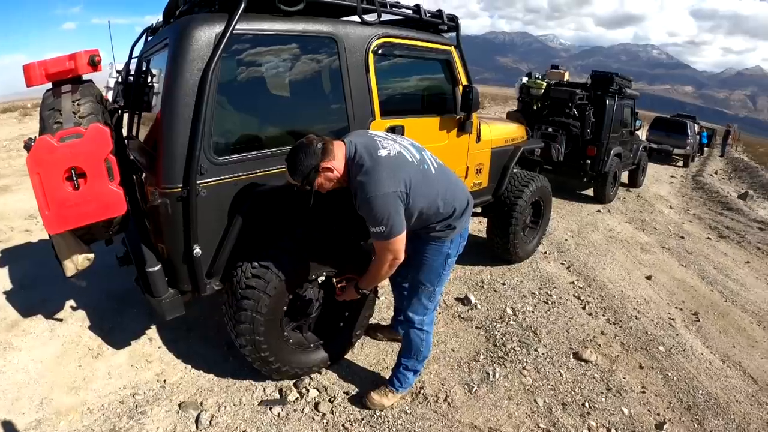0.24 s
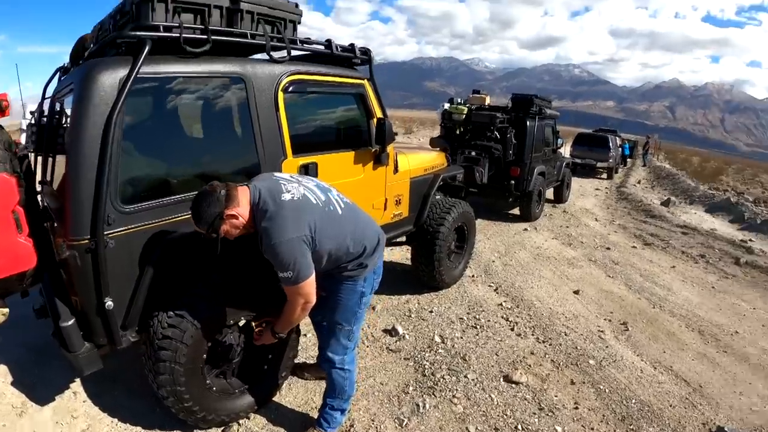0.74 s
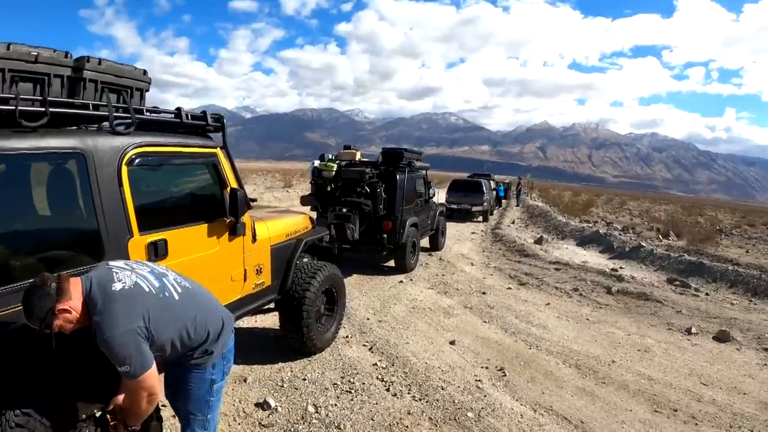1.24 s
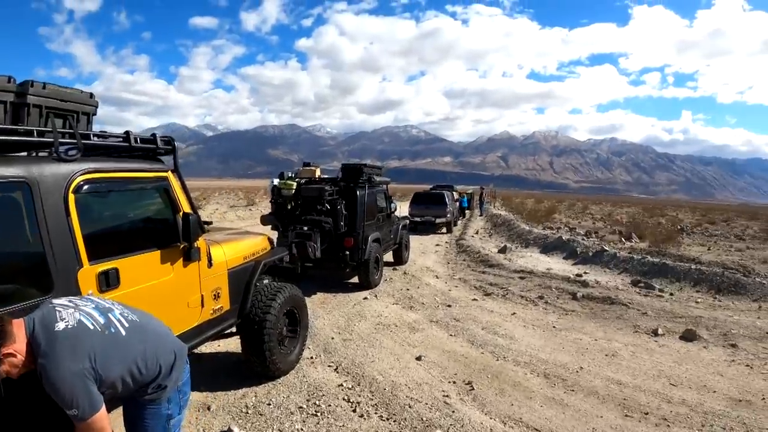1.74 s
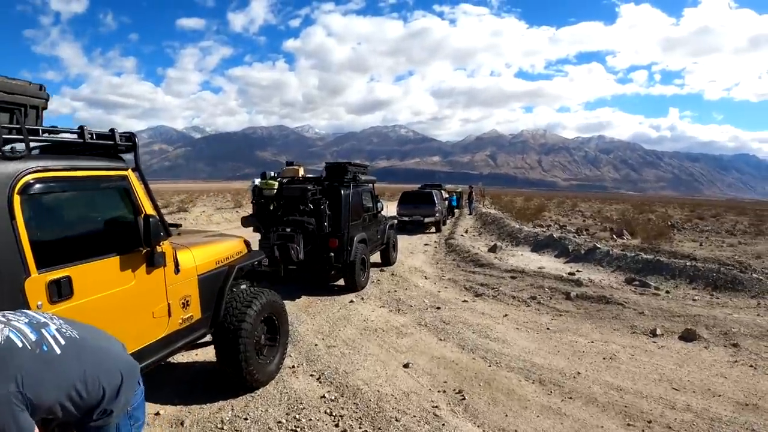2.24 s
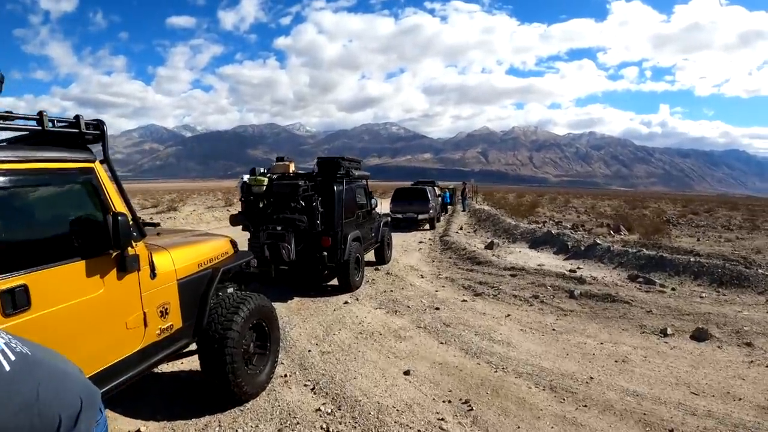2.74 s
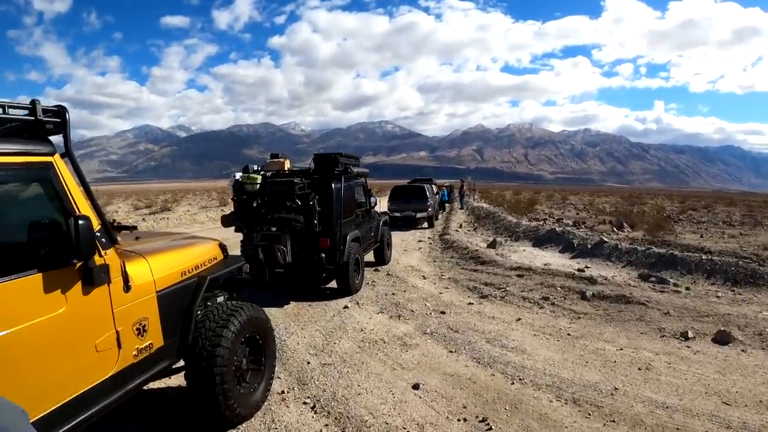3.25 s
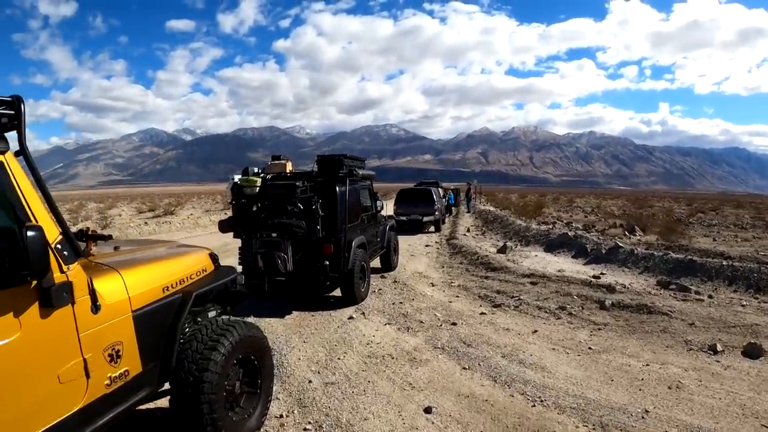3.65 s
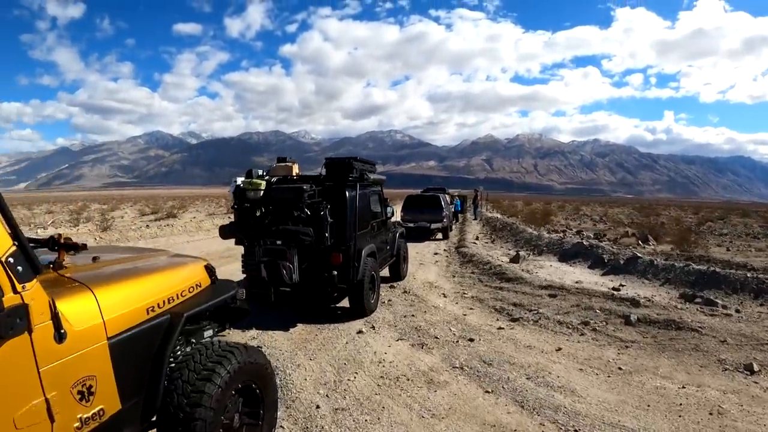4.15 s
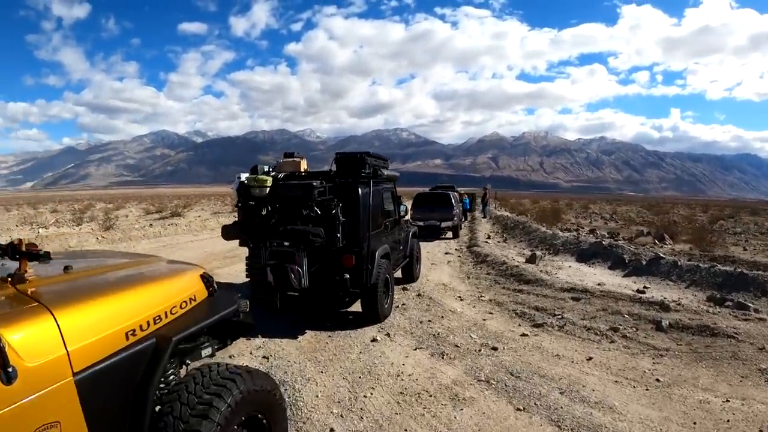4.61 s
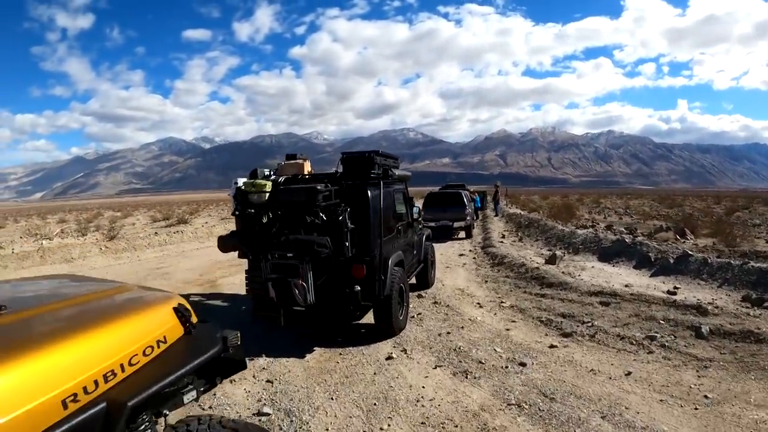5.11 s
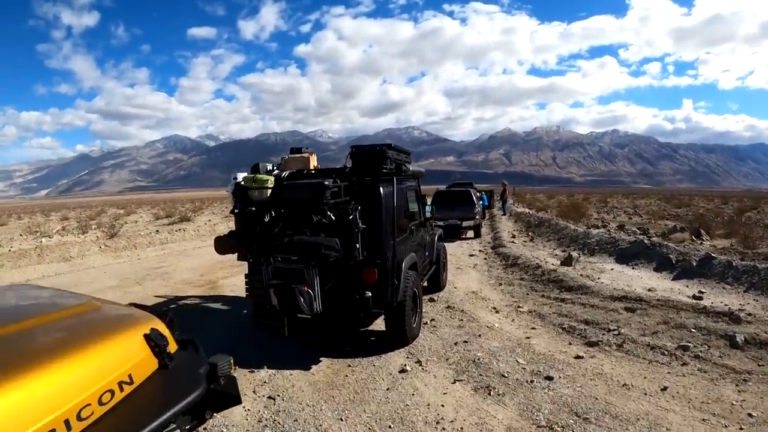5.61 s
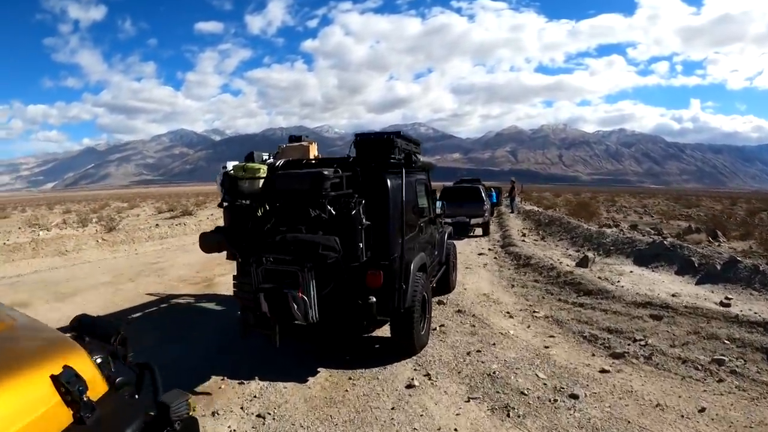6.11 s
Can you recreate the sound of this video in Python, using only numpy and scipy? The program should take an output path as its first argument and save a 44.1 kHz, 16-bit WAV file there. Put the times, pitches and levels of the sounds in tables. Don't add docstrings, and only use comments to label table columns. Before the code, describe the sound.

Air hisses steadily from a tyre valve outdoors while wind thumps and flutters on the microphone and boots crunch on grit.

```python
import sys
import numpy as np
from scipy import signal
from scipy.fft import rfft, irfft
from scipy.io import wavfile
from scipy.ndimage import uniform_filter1d, map_coordinates

SR = 44100
rng = np.random.default_rng(int(sys.argv[2]) if len(sys.argv) > 2 else 0)


def transcribe(u):
    v = np.clip(np.atleast_2d(u).T, -1, 1)
    q = np.round(v * 32767).astype(np.int16)
    wavfile.write(sys.argv[1], SR, q)


def elevation(decibels):
    levels = np.asarray(decibels, float)
    return 10 ** (levels / 20)


N = 280917
T = np.arange(N) / SR
HZ = np.fft.rfftfreq(N, 1 / SR) + 1e-9


def unit(x):
    return x / np.sqrt(np.mean(x ** 2))


def curves(table):
    times_s, *columns = np.transpose(table)
    return [np.interp(T, times_s, column) for column in columns]


def shaped(gain):
    return irfft(rfft(rng.standard_normal(N)) * gain, N)


def walk(rate):
    hold = int(SR / rate)
    steps = np.repeat(rng.standard_normal(N // hold + 1), hold)
    return unit(uniform_filter1d(uniform_filter1d(steps, hold), hold)[:N])


def bursts(events, width, rise):
    out, size = np.zeros(N), 4096
    t = np.arange(size) / SR
    noises = rng.standard_normal((len(events), size))
    for (start_s, peak_db, hz, length_ms), noise in zip(events, noises):
        b, a = signal.iirpeak(hz, 1 / width, fs=SR)
        ring = signal.lfilter(b, a, signal.lfilter(b, a, noise))
        age = t * 1000 / length_ms
        ring = ring * np.clip(age / rise, 0, 1) * np.exp(-age ** 2)
        i = int((start_s - 0.314 * rise * length_ms / 1000) * SR)
        out[i:i + size] += (elevation(peak_db) * ring / np.abs(ring).max())[:N - i]
    return out


def spells(rows, edge_ms):
    def edge(since_s):
        return np.clip(since_s * 1000 / edge_ms + .5, 0, 1) ** 2

    return sum(elevation(db) ** 2 * (edge(T - s) * edge(s + length - T)) for s, length, db in rows)


def jet():
    # t/s, level/dB, muffling by hand and camera/dB, shade of the car/dB
    jet_path = [(0, -30, 2.5, 3), (.5, -31, 0, -0.5), (1.0, -30.5, -1.5, 1), (1.3, -32, -1.5, -3),
                (1.9, -33, -2.5, -1.5), (2.15, -32, -3.5, 3), (2.5, -31.5, -3, 0), (3.0, -30.5, 1.5, 1.5),
                (3.6, -30.5, 2, 1.5), (3.9, -29.5, 0, -1.5), (4.15, -30, 2, -0.5), (4.4, -30.5, 2, 3),
                (4.7, -33, 2.5, -2.5), (5.0, -35, 2.5, -4), (5.4, -35.5, 3.5, -2.5), (5.7, -39, 11, -3),
                (5.95, -44, 8.5, 3.5), (6.37, -42.5, 10, 1)]
    # f/Hz, spectral level/dB
    jet_colour = [(600, -19), (1000, -7.5), (1500, -6.5), (2200, -2), (3300, -1), (4400, -2), (6200, -2),
                  (7550, -6), (8350, -2.5), (9300, -5), (10000, -8), (12000, -16), (14000, -26.5),
                  (15000, -33)]
    zones_hz = [1400, 2900, 5600, 9500]
    muffle_shares = [1.05, 0.26, -0.15, -0.35]
    shade_shares = [0.24, 0, 0.17, 0.43]
    # lag at start/ms, at middle/ms, at end/ms, level/dB
    echoes = [
        (2.1, 1.93, 1.64, -20.5),
        (3.1, 3.5, 2.44, -15),
        (4.9, 4.2, 4.7, -21),
        (6.8, 6.1, 7.5, -16.5),
    ]

    main_db, muffle_db, shade_db = curves(jet_path)
    tilt = np.outer(muffle_shares, muffle_db) - np.outer(shade_shares, shade_db)
    f, db = np.transpose(jet_colour)
    colour = elevation(np.interp(np.log(HZ), np.log(f), db, left=-28))
    colour = colour / np.sqrt(np.sum(colour[(HZ > 1900) & (HZ < 4200)] ** 2) / len(HZ))
    air = rfft(rng.standard_normal(N)) * colour
    puff = walk(14)
    direct = 0
    for step in range(23):
        hz = 350 * 2 ** (step / 4)
        zone = np.cos(np.pi / 2 * np.clip(4 * np.log2(HZ / hz), -1, 1)) ** 2
        place = np.interp(np.log(hz), np.log(zones_hz), np.arange(4))
        k = min(int(place), 2)
        tilt_db = tilt[k] + (place - k) * (tilt[k + 1] - tilt[k])
        waver_db = 0.55 * walk(4.5) + 0.45 * puff + 0.8 * (hz / 12000) ** 2 * walk(30)
        direct = direct + irfft(air * zone, N) * elevation(tilt_db + waver_db)
    heard = direct
    for *lags_ms, echo_db in echoes:
        lag_ms = np.interp(T, [0, T[-1] / 2, T[-1]], lags_ms) + 0.068 * walk(1.53)
        lag = lag_ms * SR / 1000
        heard = heard + elevation(echo_db) * map_coordinates(direct, [np.arange(N) - lag], order=2)
    return fringes(heard) * elevation(main_db - 1.74 + ducking())


def fringes(x):
    # start t/s, end t/s, f/Hz, level/dB
    narrow = [(-.8, 1.1, 2300, 4.5), (-.4, .8, 1750, -3), (3.0, 3.9, 9820, 3), (-.4, .9, 10300, -5),
              (-.4, .9, 5120, -4), (-.4, .9, 6120, 3), (1.1, 2.7, 8450, 5), (1.3, 2.5, 9280, -5),
              (1.3, 2.2, 9980, 4), (5.9, 6.8, 4620, 3), (1.2, 2.5, 6500, 3), (1.2, 2.1, 2350, -3),
              (2.0, 2.7, 2720, 5), (2.5, 3.6, 1900, 7), (2.5, 3.2, 3410, 6), (2.8, 3.5, 3170, -4),
              (2.7, 3.6, 5000, 6), (2.0, 2.9, 3920, 3), (2.3, 3.1, 5720, 4), (4.9, 5.5, 3250, 3),
              (4.1, 5.0, 2400, 4), (4.2, 4.8, 3200, 3), (4.0, 4.8, 1320, -4), (5.5, 6.2, 3120, -5),
              (5.9, 6.8, 5750, 6), (3.1, 4.2, 2670, 2.5), (2.5, 3.2, 2600, 3), (2.0, 2.8, 9580, 4),
              (1.0, 2.4, 4750, -3), (-.6, 2.6, 890, -7)]
    # start t/s, end t/s, f/Hz, level/dB
    broad = [
        (-.8, 1.0, 9250, 7),
        (1.4, 3.9, 7500, -5),
        (3.5, 4.3, 5900, 5),
        (5.8, 6.8, 1600, -3),
        (2.7, 3.9, 4420, -3),
        (-.4, 2.0, 3450, 4),
        (.6, 1.1, 2800, 3),
        (4.8, 6.8, 7100, 3),
    ]
    sag_per_s = .025

    f, t, spec = signal.stft(x, SR, nperseg=1024)
    db = np.zeros(spec.shape)
    for rows, breadth in ((narrow, 1), (broad, 1.9)):
        for start_s, end_s, hz, peak_db in rows:
            along = np.clip((t - start_s) / (end_s - start_s), 0, 1)
            centre_hz = hz * (1 - sag_per_s * (along - .5) * (end_s - start_s))
            width_hz = breadth * (330 + .01 * hz)
            profile = np.exp(-(2 * (f[:, None] - centre_hz) / width_hz) ** 2)
            db += 0.9 * peak_db * np.sqrt(np.sin(np.pi * along)) * profile
    patches = np.kron(rng.random((87, len(t) // 2 + 1)), np.ones((6, 2)))[:len(f), :len(t)]
    db -= 14 * (patches < .22 * np.clip((f[:, None] - 10500) / 3500, 0, 1))
    return signal.istft(spec * elevation(db), SR, nperseg=1024)[1][:N]


def ducking():
    # t/s, depth/dB, recovery/ms
    dips = [
        (1.6, -1, 27),
        (5.53, 4.5, 37),
        (5.81, 6.5, 50),
        (6.06, 3, 40),
        (6.22, 1, 44),
    ]
    attack_ms = 13

    total_db = 0
    for s, depth_db, recovery_ms in dips:
        attack = np.clip((T - s) * 1000 / attack_ms + 1, 0, 1)
        recovery = np.exp(-np.clip(T - s, 0, None) * 1000 / recovery_ms)
        total_db = total_db - depth_db * attack * recovery
    return total_db


def boots():
    # t/s, peak level/dB, f/Hz, length/ms
    grit = [(3.589, -26, 1206, 5.0), (3.629, -35, 2000, 5.0), (3.669, -27, 2010, 5.0),
            (4.3, -24, 1900, 4.6), (4.339, -28, 1064, 6.2), (4.944, -24, 1570, 6.2),
            (4.981, -19, 1200, 3.5), (5.024, -25, 1320, 4.6), (5.038, -20, 976, 5.6),
            (5.104, -25.5, 1020, 3.9), (5.169, -25, 1060, 5), (5.53, -14.5, 1110, 4.7)]
    # start t/s, length/s, level/dB
    scuffs = [
        (3.58, .1, -44),
        (4.31, 0.073, -38),
        (4.94, 0.053, -39),
        (5.01, 0.082, -37),
        (5.09, .09, -44),
    ]
    centre_hz, spread_octaves, grain_db = 1050, 0.93, 3.5

    cracks = bursts(grit, width=0.79, rise=0.2)
    colour = np.exp(-(np.log2(HZ / centre_hz) / spread_octaves) ** 2)
    drag = shaped(colour) * elevation(grain_db * walk(300))
    return cracks + unit(drag) * np.sqrt(spells(scuffs, edge_ms=25))


def wind():
    # start t/s, length/s, thump level/dB
    gusts = [(-.1, 2.09, -21), (2.05, 1.16, -22.5), (3.2, 0.16, -25), (3.365, 0.2, -38.5), (3.56, 0.1, -23),
             (3.7, 0.07, -22), (3.78, 0.053, -30), (3.85, 0.11, -39), (4.0, 0.16, -23),
             (4.16, 0.082, -22.5), (4.24, 0.056, -29.5), (4.37, .13, -30), (4.5, .2, -25.5),
             (4.7, 0.19, -38), (4.79, 0.033, -36), (4.9, 0.083, -28.5), (5.22, .04, -41),
             (5.27, .12, -21.5), (5.39, 0.4, -23.5), (5.77, 0.11, -20), (5.87, 0.13, -25.5),
             (5.95, 0.14, -23), (6.1, 0.058, -24), (6.17, 0.067, -18.5), (6.26, .2, -24.5)]
    # start t/s, length/s, flutter level/dB, rasp level/dB
    buffets = [(0.01, 0.12, -27.5, -58), (0.127, .13, -25, -51), (0.297, 0.097, -24.5, -54),
               (0.543, .08, -36, -60), (0.676, 0.063, -32, -57), (0.903, 0.18, -29.5, -55),
               (1.091, 0.12, -24.5, -37), (1.216, 0.12, -24.5, -40), (1.351, .05, -30, -43),
               (1.584, 0.059, -23, -39), (1.766, .09, -27, -38), (1.87, 0.066, -27, -48),
               (1.984, 0.065, -26, -51), (2.158, 0.098, -24.5, -49), (2.34, 0.031, -26.5, -46),
               (2.438, 0.13, -26.5, -53), (2.784, 0.037, -34, -59), (2.916, 0.076, -29, -50),
               (3.021, .19, -26, -43.5), (4.033, 0.093, -29.5, -43), (4.266, 0.23, -46, -46.5),
               (4.93, 0.146, -43.5, -43), (5.269, 0.057, -27, -58), (5.469, 0.063, -26, -51),
               (5.607, .14, -22.5, -30), (5.772, 0.086, -22, -26.5), (5.96, .06, -29.5, -41),
               (6.051, 0.036, -25, -31), (6.179, 0.079, -24.5, -31.5), (6.305, 0.048, -26, -38)]
    # t/s, peak level/dB, f/Hz, length/ms
    slaps = [(0.155, -22, 482, 7.9), (0.978, -37, 592, 8.5), (1.139, -27, 482, 7.6), (1.271, -24, 482, 8.3),
             (1.309, -30, 641, 8), (1.375, -25, 482, 9), (1.602, -19.5, 464, 12.2), (1.789, -26.5, 511, 13),
             (1.879, -34, 584, 12), (1.903, -28, 673, 8.3), (1.996, -26, 546, 8.7), (2.257, -29, 530, 11),
             (2.538, -20, 563, 6.7), (2.969, -30, 546, 10.4), (3.097, -24, 482, 6.2), (4.089, -31, 514, 11),
             (5.403, -32, 608, 7.2), (5.49, -22.5, 506, 8.5), (5.654, -21, 680, 8.4),
             (5.699, -18.5, 937, 8), (5.793, -24, 703, 8.1), (5.829, -20.5, 705, 7.1),
             (5.942, -26, 490, 8.9), (5.984, -21, 480, 7.7), (6.061, -12.5, 506, 7.5),
             (6.187, -23, 544, 7.2), (6.224, -17, 482, 6), (6.246, -27, 482, 8.0), (6.319, -32, 598, 8.0)]
    # low edge f/Hz, corner f/Hz, steepness, quick chop/dB, levelling time/ms
    thump = (17.4, 109.7, 2.84, 1.3, 60)
    flutter = (90, 227.5, 2.82, 2.13, 55)
    rasp = (290, 540, 2.3, 2.9, 32)
    calm_db, still_db, full_wind_db = -46, -55.5, -20
    gust_memory_s = 0.074

    thump_db = 10 * np.log10(elevation(calm_db) ** 2 + spells(gusts, edge_ms=36))
    rows = np.array(buffets)

    def stirred(at_full_db, db_per_db, column):
        steady = elevation(at_full_db + db_per_db * (thump_db - full_wind_db)) ** 2
        return np.sqrt(elevation(still_db) ** 2 + steady + spells(rows[:, [0, 1, column]], edge_ms=29))

    levels = (elevation(thump_db), stirred(-35, 1.33, column=2), stirred(-51.5, 0.14, column=3))
    chop = walk(32) + 1.05 * walk(60)
    chop = unit(chop - uniform_filter1d(chop, int(gust_memory_s * SR)))
    out = 0
    for (low_hz, top_hz, steep, chop_db, even_ms), level in zip((thump, flutter, rasp), levels):
        eddies = shaped(1 / np.sqrt((1 + (low_hz / HZ) ** 6) * (1 + (HZ / top_hz) ** (2 * steep))))
        k = int(even_ms * SR / 1000)
        eddies = eddies / np.sqrt(uniform_filter1d(uniform_filter1d(eddies ** 2, k), k))
        out = out + unit(eddies * elevation(chop_db * chop)) * level
    return out + bursts(slaps, width=0.65, rise=0.48)


def scene():
    mono = jet() + boots() + wind()
    return np.array([mono, mono])


def roll_off(x):
    return signal.sosfilt(signal.butter(12, 15400, fs=SR, output="sos"), x)


def record(dry):
    lowpass = signal.ellip(10, .2, 80, 14850, fs=SR, output="sos")
    soft = signal.sosfilt(lowpass, np.tanh(1.6 * dry) / 1.5)
    moments = np.clip(walk(18) - .9, 0, 1)
    trace = elevation(-37) * moments * shaped(np.clip(HZ / 3000, .4, 1) / (1 + (HZ / 10500) ** 6))
    difference = trace + elevation(-33) * moments * soft
    mix = soft + difference * np.array([[1], [-1]])
    return roll_off(mix)


dry = scene()
out = record(dry)
transcribe(out)
```